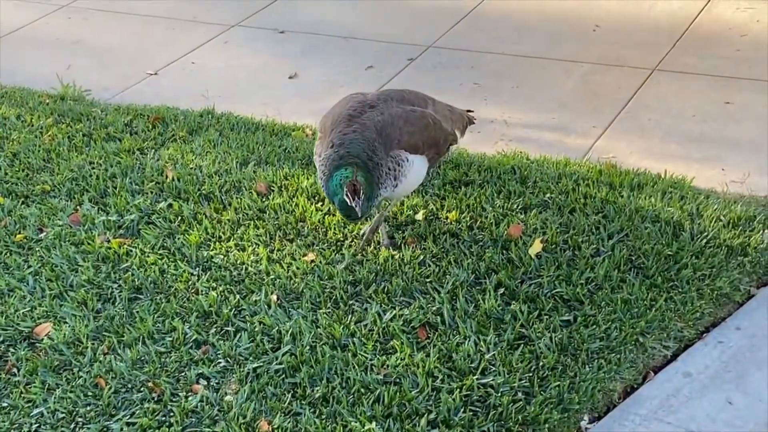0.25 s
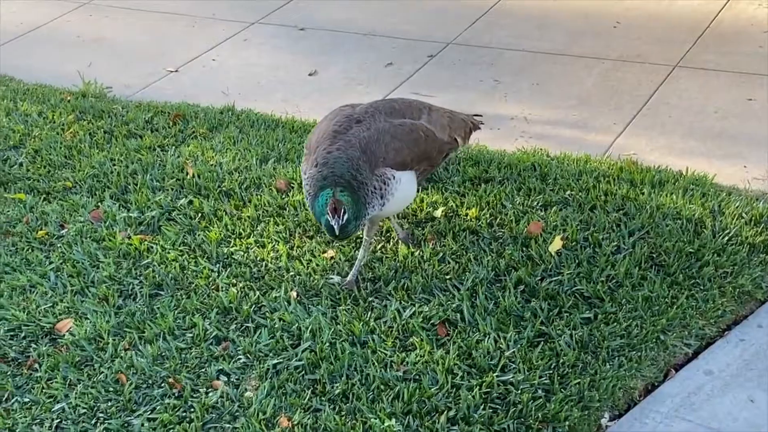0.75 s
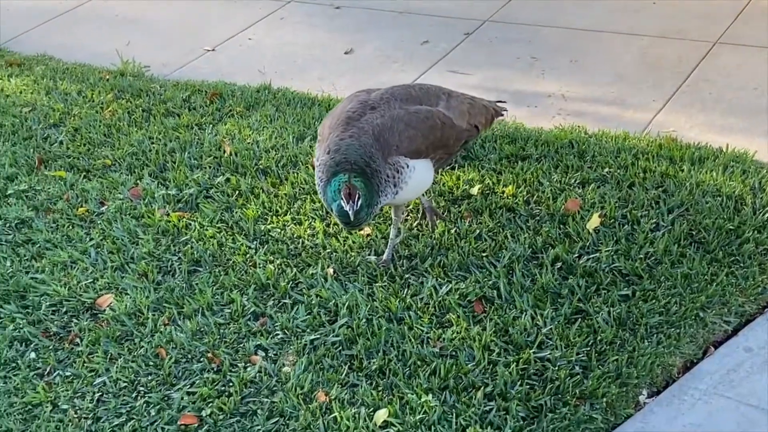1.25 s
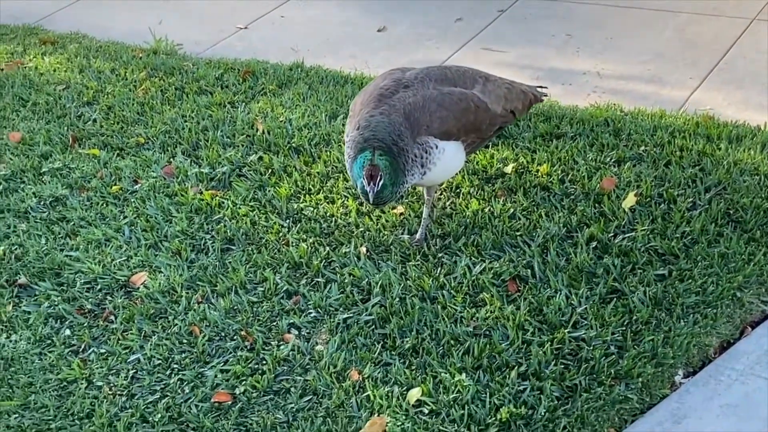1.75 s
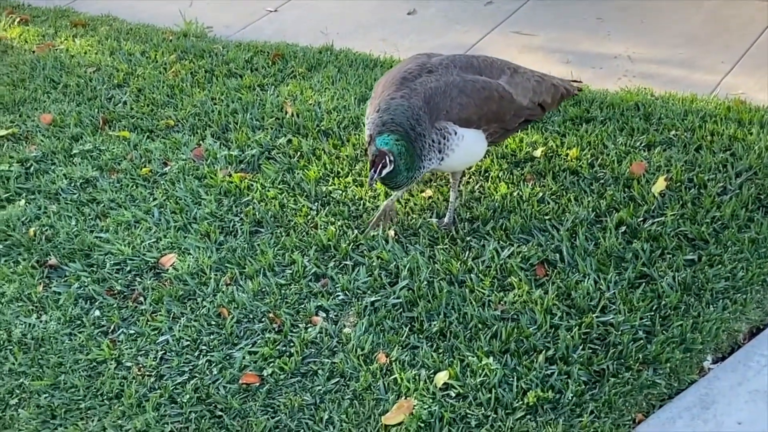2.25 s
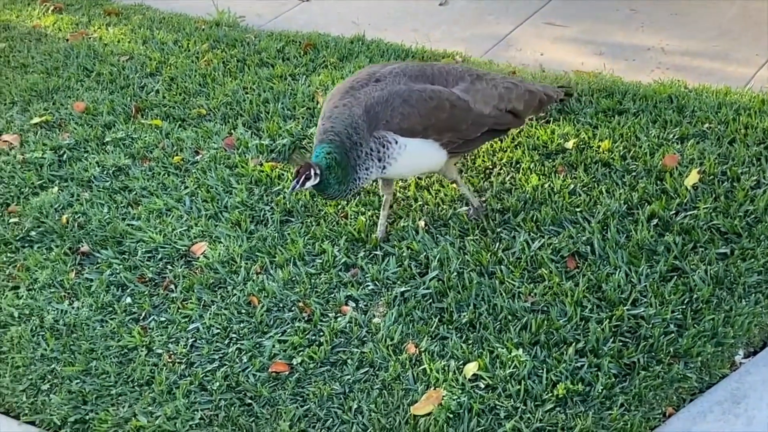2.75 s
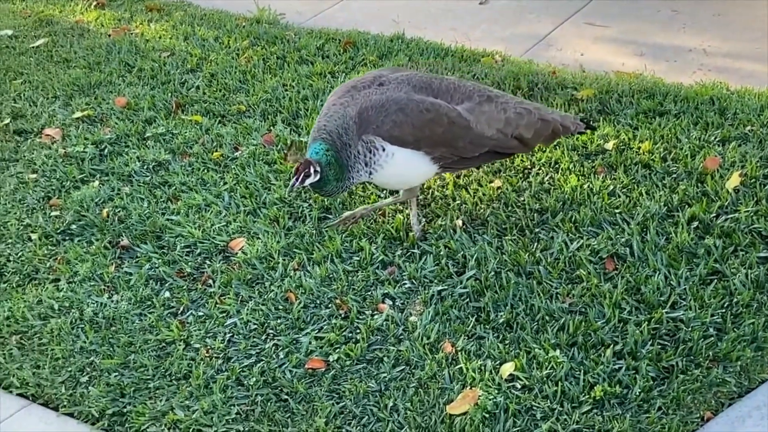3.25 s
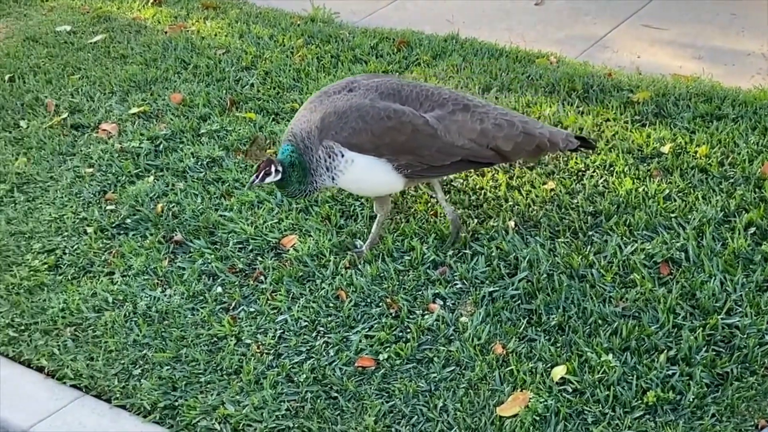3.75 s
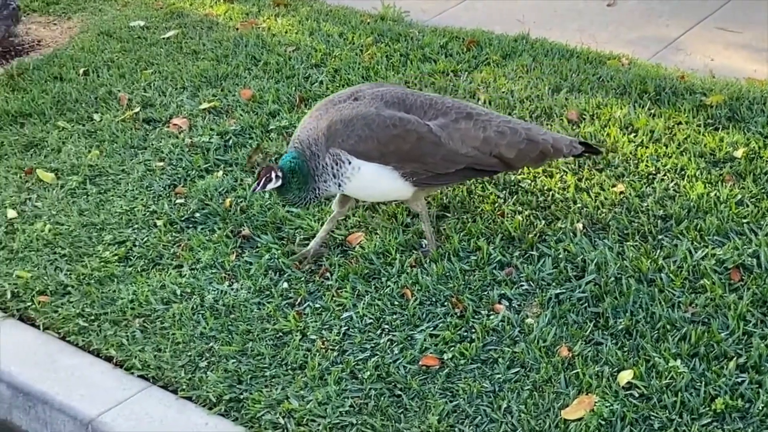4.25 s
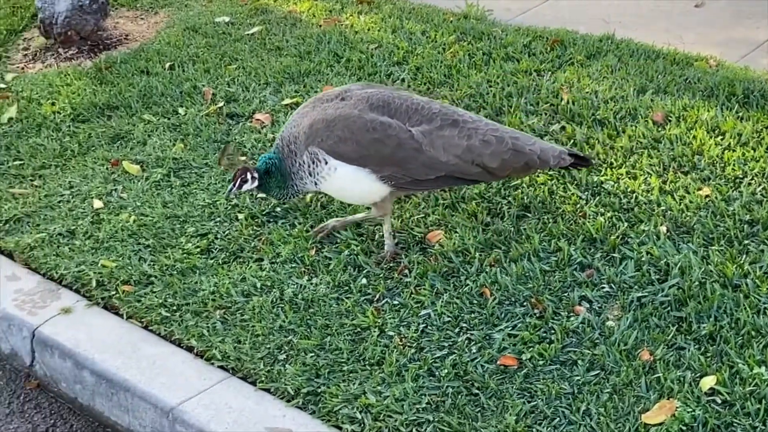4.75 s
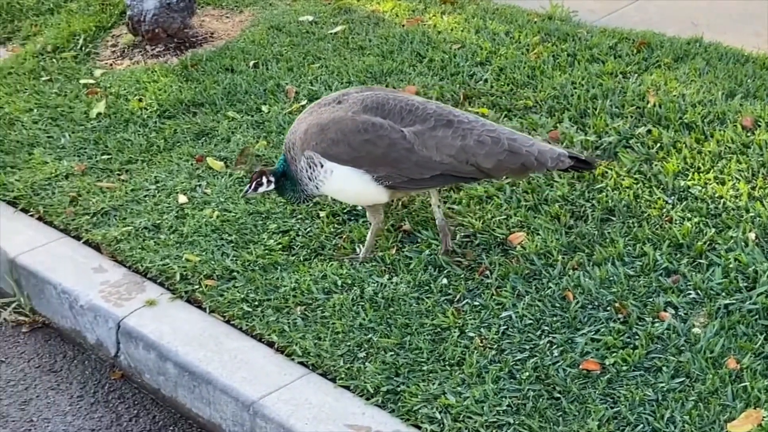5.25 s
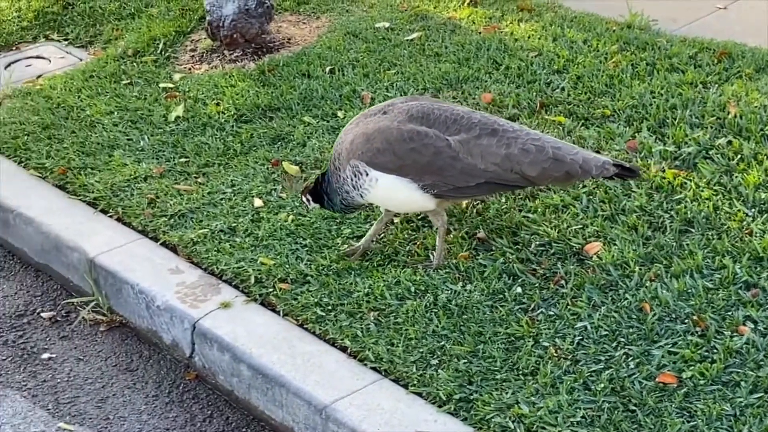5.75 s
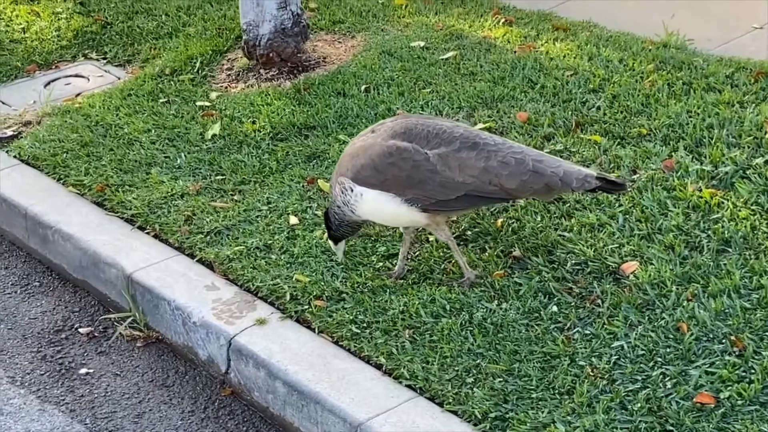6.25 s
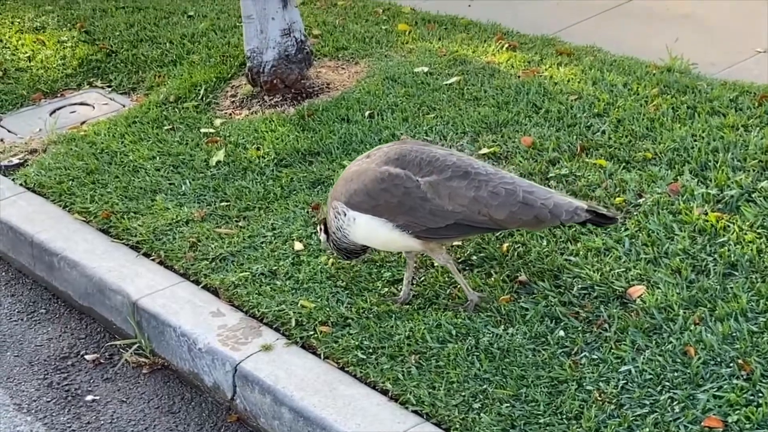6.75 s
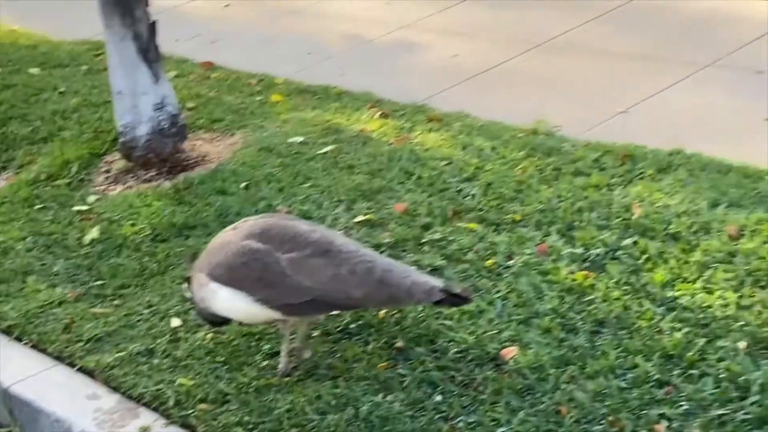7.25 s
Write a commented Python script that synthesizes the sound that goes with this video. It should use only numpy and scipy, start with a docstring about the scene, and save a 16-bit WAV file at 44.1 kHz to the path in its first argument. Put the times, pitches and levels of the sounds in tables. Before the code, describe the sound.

Quiet suburban lawn with chirping small birds, three distant crow caws and a passing car, then a loud long peafowl honk and a short one cut off.

```python
"""A suburban lawn, a phone with two microphone ports: over the far rumble of town small birds
chip and whistle, feet and beak brush the grass close by, and a crow caws three times far off.
A car speeds up along the street, its engine tones climbing; then a peafowl near the phone honks twice,
and the houses throw the honks back. Voices are harmonics or glides through resonances,
tyres, grass and rasp are shaped noise, and the echoes are sparse taps."""
import sys
import numpy as np
from scipy import signal
from scipy.fft import rfft, irfft, next_fast_len
from scipy.io import wavfile
from scipy.ndimage import uniform_filter1d

SR = 44100
rng = np.random.default_rng(int(sys.argv[2]) if len(sys.argv) > 2 else 0)


def log_audio(samples):
    """Write samples as a 16-bit WAV file to the path given in sys.argv[1]."""
    # one column per channel
    frames = np.atleast_2d(samples).T
    # limit to full scale, then quantise
    limited = np.clip(frames, -1, 1)
    pcm = np.round(limited * 32767).astype(np.int16)
    wavfile.write(sys.argv[1], SR, pcm)


N = 330750
EDGE_HZ = 15900  # top of the recorder's band


def gain_of(db):
    """Decibels to gain."""
    return 10 ** (np.asarray(db) / 20)


def evened(x):
    """Scales to rms 1."""
    return x / np.sqrt(np.mean(x ** 2) + 1e-20)


def along(points, t):
    """Reads a two-column table on a linear axis."""
    return np.interp(t, *np.transpose(points))


def read(points, hz):
    """Reads a spectrum on a log-frequency axis."""
    f, value = np.transpose(points)
    return np.interp(np.log(hz + 1), np.log(f + 1), value)


def shaped(x, points, size):
    """Filters a sound by a table of levels over frequency."""
    return irfft(rfft(x, size) * gain_of(read(points, np.fft.rfftfreq(size, 1 / SR))), size)


def add(mix, start_s, sound):
    """Mixes a sound in at its start time, cutting what falls outside."""
    at = round(start_s * SR)
    sound = sound[max(-at, 0):]
    part = mix[max(at, 0):][:len(sound)]
    part += sound[:len(part)]


def turning(hz):
    """Phase in radians of a tone that follows the curve hz."""
    return 2 * np.pi * np.cumsum(hz) / SR


def slow(count, hz, order=2):
    """Smooth chance of rms 1: noise low-passed at hz, past the filter's run-in."""
    low_pass = signal.butter(order, hz, fs=SR, output="sos")
    return evened(signal.sosfilt(low_pass, rng.standard_normal(count + 4000))[4000:])


def resonate(x, hz, width):
    """Shifts the curve hz down to zero, smooths, and shifts back: a resonance of gain 1."""
    turn = np.exp(1j * turning(hz * np.ones(len(x))))
    r = np.exp(-np.pi * width / SR)
    return 2 * (turn * signal.lfilter([1 - r], [1, -r], x / turn)).real


def resonate_twice(x, hz, width):
    """Two equal resonances in a row, for steeper skirts."""
    return resonate(resonate(x, hz, width), hz, width)


# far rumble of town: (frequency [Hz], relative level [dB per Hz])
TOWN_SPECTRUM = [(30, -79), (50, -59), (80, -63), (130, -69), (300, -84), (500, -86.5), (800, -89),
                 (1700, -92), (3200, -107), (5500, -114), (8500, -119), (11000, -114), (14000, -116),
                 (16000, -122)]
# tyres and exhaust on the street: (frequency [Hz], relative level [dB per Hz])
CAR_SPECTRUM = [(50, -59.5), (80, -78.5), (200, -70.5), (300, -77.5), (700, -79), (1200, -84.5),
                (2300, -94), (4200, -101), (7000, -115), (12000, -130)]
# how near the car sounds: (time [s], added level [dB])
CAR_APPROACH = [(0, -11.5), (1.198, -4.5), (2.2, -14), (3.6, -22), (4.62, -5.5), (5.4, -0.5), (6.6, 6),
                (7.5, 2)]


def town_and_car():
    """Far rumble and the passing car: two unlike noises, built in short frames with drifting patches."""
    frames, hz = N // 256 + 5, np.fft.rfftfreq(1024, 1 / SR)
    a, b, c, d, patches = rng.standard_normal((frames, 513, 5)).T
    patches_db = evened(uniform_filter1d(uniform_filter1d(patches, 10, 0), 14, 1))
    near_db = along(CAR_APPROACH, np.arange(frames) * 256 / SR)
    town = gain_of(read(TOWN_SPECTRUM, hz))[:, None]
    car = gain_of(read(CAR_SPECTRUM, hz)[:, None] + near_db)
    z = np.array([a + 1j * b, c + 1j * d]) * np.hypot(town, car) * gain_of(patches_db)
    unit = np.sqrt(SR / 512)  # dB per Hz to the scale of one frame
    return 0.58 * unit * signal.istft(z, nperseg=1024, noverlap=768)[1][:, :N]


# falling chips; each starts 10 ms before its time: (time [s], level [dB], pitch it falls towards [Hz])
CHIP_ROWS = [(-.012, -54, 3690), (0.067, -55, 3590), (0.146, -54, 3670), (0.242, -56, 3770),
             (0.323, -53, 3680), (.405, -56, 3540), (0.48, -54, 3620), (0.562, -56.5, 3720),
             (0.641, -58, 3760), (.725, -59, 3740), (0.794, -61.5, 4050), (0.843, -60.5, 4050),
             (.9, -61, 3850), (.953, -60.5, 3720), (1.014, -63.5, 3730), (1.071, -61, 3780),
             (1.126, -64, 3680), (1.184, -60.5, 3610), (1.248, -61, 3660), (1.317, -63, 3480)]
# longest chip [s]; chips softer than CHIP_FULL_DB are shorter [s per dB]
CHIP_S, CHIP_S_PER_DB, CHIP_FULL_DB = 0.0466, .0033, -55.5


def chips():
    """A small bird's chips: tones that drop fast, then slowly, blurred by leaves and walls."""
    out = np.zeros(N)
    for s, db, end_hz in CHIP_ROWS:
        t = np.arange(0, CHIP_S + CHIP_S_PER_DB * min(db - CHIP_FULL_DB, 0), 1 / SR)
        done = t / t[-1]
        drop_hz = rng.uniform(3300, 4600) * t[-1] / CHIP_S
        hz = end_hz + drop_hz * np.exp(-t / rng.uniform(.007, .009)) + 130 * (1 - done)
        swell = np.interp(done, [0, .1, .22, .45, .7, .88, 1], [0, .2, .5, .35, .8, .8, 0])
        swell = swell * (1 + .4 * slow(len(t), 260))
        for late_s, echo_db in ((0, -.5), (.006, -8)):  # nearby surfaces smear the sweep
            add(out, s - .01 + late_s, gain_of(db + echo_db) * swell * np.sin(turning(hz)))
    return out


# far whistles, blurred by distance:
# (start [s], end [s], from pitch [Hz], to pitch [Hz], blur [Hz], level [dB])
WHISTLE_ROWS = [(0.106, 0.47, 4530, 4740, 80, -72.5), (0.409, 0.61, 4310, 4370, 100, -66),
                (0.778, 0.943, 4440, 4300, 90, -72), (1.053, 1.31, 5160, 4980, 330, -69.5),
                (1.43, 1.595, 4160, 4300, 402, -62), (3.425, 3.68, 4700, 4770, 100, -72),
                (3.79, 3.862, 5800, 5450, 25, -66.5), (4.629, 4.727, 4470, 3570, 150, -68.5),
                (4.971, 5.318, 3900, 3950, 90, -72.5), (5.058, 5.082, 6350, 7650, 100, -73),
                (5.701, 5.822, 4220, 3780, 300, -66)]


def whistles():
    """Far whistles: noise in narrow gliding resonances, its level wavering."""
    out = np.zeros(N)
    for start, end, from_hz, to_hz, blur, db in WHISTLE_ROWS:
        hz = np.linspace(from_hz, to_hz, round((end - start) * SR))
        hz = hz * (1 + .01 * slow(len(hz), 12))
        air = evened(resonate_twice(rng.standard_normal(len(hz)), hz, blur))
        level = gain_of(db + 2.5 * slow(len(hz), 17.4))
        add(out, start, level * air * signal.windows.tukey(len(hz), .4))
    return out


# many far birds: (time [s], level of each of three bands [dB])
CHATTER_LEVEL = [(0, -83), (1.3, -87), (1.8, -75.5), (3.2, -80.5), (3.7, -75.5), (3.95, -101), (5.2, -101)]


def chatter():
    """Many far birds at once: broken noise in three wandering resonances."""
    out = np.zeros(N)
    level_db = along(CHATTER_LEVEL, np.arange(N) / SR)
    for hz in (3900, 4500, 5100):
        glide = hz * (1 + .025 * slow(N, 9))
        air = evened(resonate_twice(rng.standard_normal(N), glide, 480))
        out += gain_of(level_db + 5.0 * slow(N, 8.5)) * air
    return out


# feet and beak brushing the grass: (start [s], length [s], level [dB])
BRUSH_ROWS = [(1.02, 0.053, -59.5), (1.888, 0.21, -72), (2.05, 0.36, -73.5), (2.39, 0.32, -70),
              (2.664, 0.21, -71), (3.413, 0.23, -71.5), (4.224, 0.084, -69.5), (4.843, 0.19, -72),
              (6.224, 0.13, -70)]
# colour of the brushed grass: (frequency [Hz], level [dB])
GRASS_COLOUR = [(1500, -15), (2700, 0), (6000, -5), (8500, -4), (11000, 1), (13500, -3), (16000, -26)]
# a knock on something hollow: (time [s], level [dB], pitch [Hz])
PECK_RINGS = [(2.670, -39, 900), (2.669, -46, 2220)]


def grass():
    """Brushes on the lawn are crackly hiss; the peck is two short rings, almost at once."""
    stroke, t = np.zeros(N), np.arange(600) / SR
    for start, length, db in BRUSH_ROWS:
        add(stroke, start, gain_of(db) * np.hanning(round(length * SR)) ** 0.21)
    crackle = rng.standard_normal(N) * gain_of(3.0 * slow(N, 400))
    out = stroke * evened(shaped(crackle, GRASS_COLOUR, N))
    for s, db, hz in PECK_RINGS:
        add(out, s, gain_of(db) * np.sin(2 * np.pi * hz * t) * np.exp(-t / 0.0026))
    return out


# snapping blades: (time [s], peak level [dB])
SNAP_ROWS = [(1.035, -51), (1.925, -48), (2.773, -51), (4.249, -55), (4.9506, -34.5), (6.2026, -53)]


def snaps():
    """Blades snapping close to the phone: tiny noise bursts through a broad treble resonance."""
    out, t = np.zeros(N), np.arange(300) / SR
    for s, db in SNAP_ROWS:
        burst = resonate(rng.standard_normal(300) * np.exp(-t / .0004), 10500, 5500)
        add(out, s, gain_of(db) * burst / abs(burst).max())
    return out


# far crow: (start [s], length [s], effort [dB])
CAW_ROWS = [(1.83, .33, -50.5), (2.335, .315, -50.5), (2.862, .325, -50)]
# the crow's throat at rest: (resonance [Hz], width [Hz], level [dB])
CROW_THROAT = [(1460, 540, 0), (1860, 300, -7.5), (2850, 230, -13.5), (3130, 240, -7), (5450, 1200, -19.5)]


def crow():
    """Pulses and rasp through the crow's throat, whose resonances rise quickly, then sink a little in each caw."""
    out = np.zeros(N)
    for start, length, effort_db in CAW_ROWS:
        t = np.arange(0, length, 1 / SR)
        pulses = np.cumsum(75 * (1 + 0.24 * slow(len(t), 37))) / SR
        rasp = (.5 + np.exp(-(pulses % 1) / .35)) * rng.standard_normal(len(t))
        cycles = np.cumsum(510 * (1 + .05 * slow(len(t), 45))) / SR % 1
        rasp = rasp * (1 + 2.5 * np.exp(-cycles / .1)) + 2.5 * np.exp(-cycles / .05)  # a hoarse pitch shows
        stretch = 1.02 - .1 * t - .07 * np.exp(-t / .03)
        voice = np.zeros(len(t))
        for f, width, db in CROW_THROAT:
            darkening_db = 7.9 * t * f / 1000
            voice += gain_of(db - darkening_db) * evened(resonate_twice(rasp, f * stretch, width))
        swell_db = np.interp(t / length, [0, .04, .3, .85, 1], [-9, -1, 1.5, 1, -8])
        add(out, start, gain_of(effort_db + swell_db) * voice)
    return out


# engine tones rising as the car pulls away on the street:
# (start [s], end [s], from pitch [Hz], to pitch [Hz], level [dB])
ENGINE_TONES = [(4.55, 5.3, 74, 88, -45), (4.55, 4.95, 248, 272, -54), (5.2, 6.05, 145, 182, -50),
                (6.2, 7.1, 98, 108, -48), (6.62, 7.0, 238, 262, -37)]


def engine():
    """Slightly unsteady tones that swell and fade as they climb."""
    out = np.zeros(N)
    for start, end, from_hz, to_hz, db in ENGINE_TONES:
        count = round((end - start) * SR)
        hz = np.linspace(from_hz, to_hz, count) * (1 + 0.0099 * slow(count, 2.5))
        level = gain_of(db + 2.0 * slow(count, 5.3)) * np.sqrt(np.hanning(count))
        add(out, start, level * np.sin(turning(hz)))
    return out


# the peafowl near the phone, one table a honk: (time [s], pitch [Hz], effort [dB])
HONK_CURVES = [
    [(6.272, 689, -58), (6.292, 680, -41), (6.301, 686, -30), (6.311, 627, -22.5), (6.322, 682, -47),
     (6.342, 681, -54), (6.352, 643, -27), (6.363, 660, -38), (6.385, 685, -26.5), (6.418, 695, -16),
     (6.5, 721, -16), (6.55, 734.8, -18), (6.62, 734.4, -16), (6.72, 739.2, -16.5), (6.86, 735.9, -14.5),
     (6.93, 733.4, -16), (6.958, 723.4, -20), (6.985, 721.6, -17.5), (6.997, 706, -24),
     (7.002, 616.6, -27.5), (7.024, 575, -31)],
    [(7.195, 612, -29), (7.21, 596, -29.5), (7.22, 612.5, -26), (7.238, 636, -30), (7.25, 633, -31.5),
     (7.268, 646.5, -28.5), (7.302, 653.7, -29.5), (7.328, 657.3, -34.5), (7.392, 688.8, -33.5),
     (7.44, 691.2, -32.5), (7.52, 692, -35.5)],
]
# throat and beak, one table a honk: (resonance [Hz], width [Hz], level [dB])
HONK_THROATS = [
    [(795, 166, -5.5), (1212, 59, 1), (1476, 198, -0.5), (1715, 210, -10.5), (2245, 103, -22),
     (2898, 350, -27), (3550, 940, -28.5), (4233, 380, -23), (5100, 770, -29), (6030, 2000, -31.5),
     (9200, 2600, -37), (12700, 8000, -52)],
    [(762, 170, 3), (1276, 130, 2.5), (1832, 78, 7), (2179, 176, 4.5), (2790, 370, -0.5), (3418, 170, 3),
     (3160, 200, 0), (4090, 227, 7), (4564, 91, 5), (4830, 2000, -8), (6060, 370, -20), (7550, 160, -14),
     (8260, 460, -15), (9890, 380, -15.5), (12400, 980, -31), (14750, 430, -30.5)],
]
# the beak opens or closes and shifts the resonances, one table a honk: (time [s], shift [%])
BEAK_SHIFTS = [
    [(6.5, .2), (6.55, -1.5), (6.72, .1), (6.83, .6), (6.9, 3.5), (6.99, 2.2)],
    [(7.395, .1), (7.43, -2.2), (7.5, -4.2)],
]
# the voice settles after it starts, one row a honk: (flutter rate [Hz], flutter depth at first [Hz],
# depth when settled [Hz], settling time [s], brightness at first [dB per kHz], when settled [dB per kHz],
# early grain [dB])
HONK_VOICES = [(52.03, 13, 4.8, 0.12, -3, .7, 1.5), (41.8, 5, 0.23, 0.075, -4, 1.59, 7)]
# one row a honk: (time the beak takes to open [s], moment the middle treble is in [s])
BEAK_OPENINGS = [(.25, 6.46), (.01, 7.235)]
# colour while the beak opens: (frequency [Hz], level [dB])
HALF_OPEN_COLOUR = [(2200, 0), (2900, -2), (4250, 3), (5000, -16), (5700, 4)]
# tone at pitch plus flutter: (frequency [Hz], share per Hz of settled depth [1/Hz])
SUM_TONE_SHARE = [(1500, .005), (2220, .085), (2900, .01)]
ENTRY_DB_PER_S = 216  # rise of the middle treble before its moment
DULL_DB = 1.3  # a weak start loses this a harmonic for each dB under the working range
# air noise [dB], rasp [dB] and phase wander [radians] of upper harmonics, each per Hz of flutter depth
BREATH_DB, RASP_DB, WANDER = -51, -30.5, .08
RASP_HZ = 205  # fastest rasp


def honk(rows, beak, throat, voice, opening):
    """Harmonics of the syrinx, shaken by a slow second vibration, each as loud as the throat lets it."""
    s, *columns = np.transpose(rows)
    t = np.arange(s[0], s[-1], 1 / SR)
    count, age = len(t), t - s[0]
    hz, effort_db = (np.interp(t, s, c) for c in columns)
    stretch = 1 + along(beak, t) / 100
    flutter_hz, first_depth, settled_depth, settle_s, first_bright, settled_bright, grain_db = voice
    open_s, entry_s = opening
    weak_db = np.maximum(effort_db.max() - 8 - effort_db, 0)
    unsettled = np.exp(-age / settle_s)
    depth = settled_depth + (first_depth - settled_depth) * unsettled
    bright = settled_bright + (first_bright - settled_bright) * unsettled
    flutter = turning(flutter_hz * (1 + .05 * slow(count, 8)))
    jitter = .15 * slow(count, 60, order=4)
    closed = np.exp(-(age / open_s) ** 4)
    wait_s = np.maximum(entry_s - t, 0)
    out = np.zeros(count)
    for k in range(1, 27):
        f = k * hz
        # the throb reaches each harmonic at its own time
        beat = flutter + 2 * np.pi * rng.random() + .2 * min(k, 7) * slow(count, 9)
        shake = 1.4 * np.cos(beat) + .3 * np.cos(2 * beat + .8) + jitter
        base_phase = turning(hz + depth * shake * min(1, 3.7 / k))  # sweep stops widening higher up
        throb = depth * (.032 * np.cos(beat + .6) + .014 * np.cos(2 * beat + 2.5))
        throb = throb * min(1.25 * (k - 1), 1.3)

        power = 0
        for centre, width, db in throat:
            power = power + gain_of(2 * db) / (1 + (2 * (f - centre * stretch) / width) ** 2) ** 2
        # rough upper harmonics come and go, and break up at first
        drift_db = depth * min(.025 * k ** 2 - .02, .28) * slow(count, 9)
        drift_db = drift_db + (k > 2) * grain_db * unsettled ** .35 * slow(count, 26)
        opening_db = closed * read(HALF_OPEN_COLOUR, f) - ENTRY_DB_PER_S * wait_s * (4 < k < 10)
        dull_db = DULL_DB * weak_db * unsettled * (k - 1.5)
        level = np.sqrt(power) * gain_of(bright * f / 1000 + drift_db + opening_db - dull_db) * (f < EDGE_HZ)

        # air noise clings to each harmonic; a faster rasp joins from the third
        breath = gain_of(BREATH_DB) * depth * k ** 1.3 * slow(count, 40 + 1.5 * k ** 2, order=6)
        rasp = gain_of(RASP_DB) * depth * min(k - 2, 3) * (k > 2) * slow(count, RASP_HZ, order=8)
        wander = WANDER * depth * np.clip(k - 3.5, 0, 2.5) * slow(count, 30, order=4)
        phase = k * base_phase + 2 * np.pi * rng.random() + wander
        sum_tone = settled_depth * read(SUM_TONE_SHARE, f) * np.cos(phase + beat + 0.23)
        out += level * ((1 + throb + breath + rasp) * np.cos(phase) + sum_tone)
    return s[0], np.sqrt(2) * gain_of(effort_db) * out * signal.windows.tukey(count, .03)


# echoes off the houses: (frequency [Hz], time to fall 60 dB [s])
YARD_DECAY = [(300, 0.15), (1400, 1), (3000, .8), (6000, 0.79), (12000, 0.26)]


def yard(x):
    """Two unlike tails of sparse echoes, each band dying at its own speed."""
    at = np.arange(900, 2 * SR - 20, 20)
    taps = np.zeros((2, 2 * SR))
    signs = rng.choice([-1., 1.], (2, len(at)))
    np.put_along_axis(taps, at + rng.integers(0, 20, (2, len(at))), signs, 1)
    hz, t, z = signal.stft(taps, SR, nperseg=256)
    decay = gain_of(-60 * t / read(YARD_DECAY, hz)[:, None])
    tail = signal.istft(z * decay, SR, nperseg=256)[1]
    return signal.fftconvolve(x[None], tail / np.linalg.norm(tail[0]), axes=1)[:, :N]


# what the house walls return of a honk: (frequency [Hz], level [dB])
WALL_COLOUR = [(730, -21), (1470, -16), (2900, -14.5), (4400, -24.5), (6000, -22), (11000, -21)]
FAR_WALL_S, FAR_WALL_DB = .19, -5  # delay and level of one clear echo


def houses(peafowl, far):
    """The walls colour the honks, the yard scatters them with the far birds, one wall answers clearly."""
    returned = shaped(peafowl, WALL_COLOUR, 2 * N)[:N]
    echoes = yard(returned + far)
    for side in echoes:
        add(side, FAR_WALL_S, gain_of(FAR_WALL_DB) * returned)
    return echoes


# phase between left and right in the treble, for all sound sent through ports():
# (frequency [Hz], phase [radians])
TREBLE_PHASE = [(7450, 0), (8600, -2.5), (10800, -5.5), (12800, -11.5), (14800, 3.5), (16000, 0)]
# how alike far sound is at the two ports: (frequency [Hz], likeness [0-1])
PORT_LIKENESS = [(100, 0.99), (500, 0.67), (800, 1), (1200, 0.09), (1700, 0.19), (2300, 0.8), (4200, 1),
                 (7000, 0.96), (9000, 0.8), (15000, 1)]


def ports(a, b, side_phase, pan=((1, 0), (2, 0))):
    """Two microphone ports: the right hears a, partly swapped for the unlike b, with its phase and balance."""
    size = next_fast_len(N + SR // 2)
    hz = np.fft.rfftfreq(size, 1 / SR)
    left = right = rfft(a, size)
    if b is not None:
        same = np.clip(read(PORT_LIKENESS, hz), 0, 1)
        right = same * left + np.sqrt(1 - same ** 2) * rfft(b, size)
    turn = np.exp(-1j * (along(side_phase, hz) + along(TREBLE_PHASE, hz)))
    half = gain_of(read(pan, hz) / 2)  # half the balance to each port
    return irfft(np.array([left * half, right * turn / half]), size)[:, :N]


# phase between left and right on the street side: (frequency [Hz], phase [radians])
STREET_PHASE = [(0, 0), (250, .5), (1290, 2.6), (1700, 3.3), (2200, 6.65), (3800, 6.28)]
# the same on the peafowl's side: (frequency [Hz], phase [radians])
PEAFOWL_PHASE = [(0, 22), (430, -1), (700, -1.4), (1460, -2.5), (1850, -8), (2100, -5.5), (3300, -6)]
# balance of the ports, one table a honk: (frequency [Hz], left minus right [dB])
HONK_BALANCE = [
    [(700, -0.5), (1450, -4.5), (2200, 1.5), (3000, 0)],
    [(700, 1), (1300, -2), (1850, 5), (2070, 9), (2700, -0.3)],
]


def scene():
    """Peafowl on one side of the phone, other sources on the street side; snaps reach both ports alike."""
    rumble = town_and_car()
    birds = chips() + whistles() + chatter()
    mix = ports(birds + grass() + engine(), None, STREET_PHASE) + snaps()
    caws = crow()
    mix += ports(caws, crow(), STREET_PHASE)  # from afar the rasp arrives partly scattered
    peafowl = np.zeros(N)
    honks = zip(HONK_CURVES, BEAK_SHIFTS, HONK_THROATS, HONK_VOICES, BEAK_OPENINGS)
    for settings, balance in zip(honks, HONK_BALANCE):
        one = np.zeros(N)
        add(one, *honk(*settings))
        peafowl += one
        mix += ports(one, None, PEAFOWL_PHASE, balance)
    echoes = houses(peafowl, gain_of(-12) * caws + gain_of(-13) * birds)
    around_balance = [(100, -1.3), (400, 1.5), (1400, -1.9), (2500, 0.074)]  # (frequency [Hz], L-R [dB])
    return mix + ports(*(echoes + rumble), STREET_PHASE, around_balance)


def record(dry):
    """The deepest bass is cut away; then the band limit of the recorder."""
    thin = signal.sosfilt(signal.butter(4, 44, "high", fs=SR, output="sos"), dry)
    band = signal.firwin(511, EDGE_HZ, window=("kaiser", 9), fs=SR)
    return signal.oaconvolve(thin, band[None], "same")


dry = scene()
out = record(dry)
log_audio(out)
```